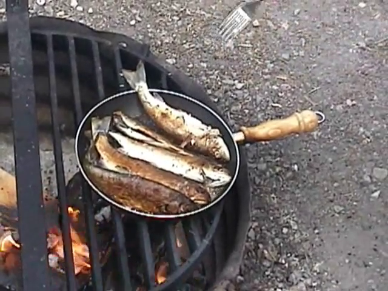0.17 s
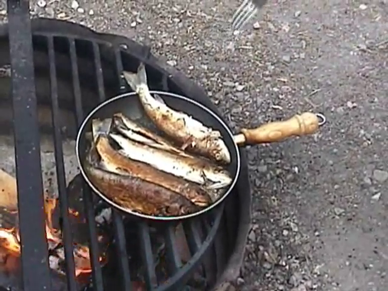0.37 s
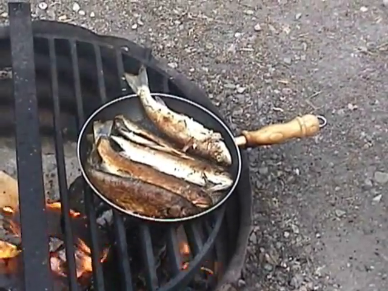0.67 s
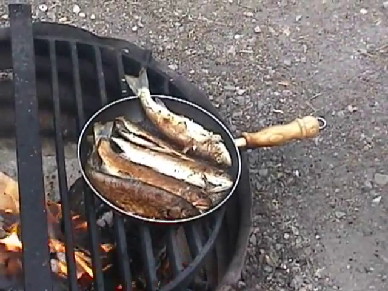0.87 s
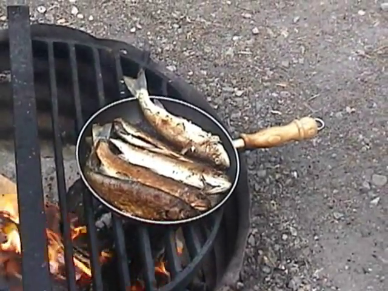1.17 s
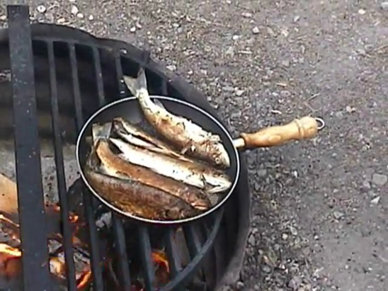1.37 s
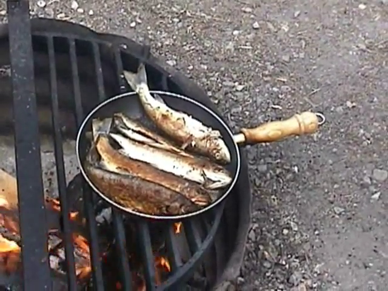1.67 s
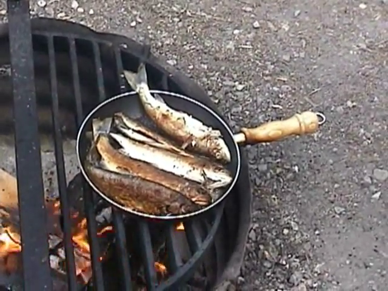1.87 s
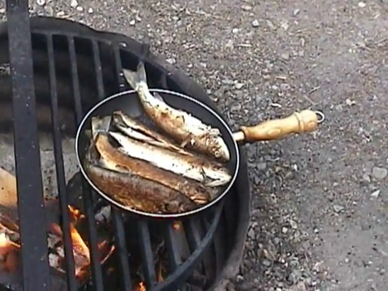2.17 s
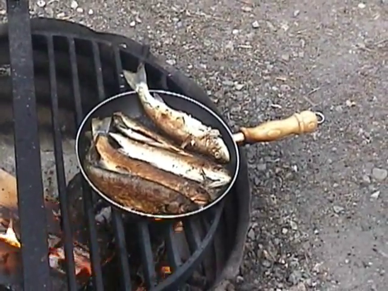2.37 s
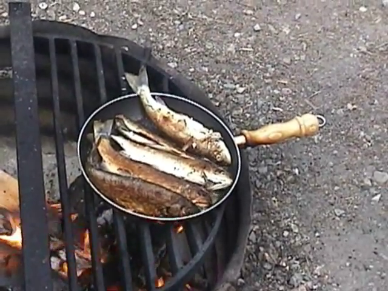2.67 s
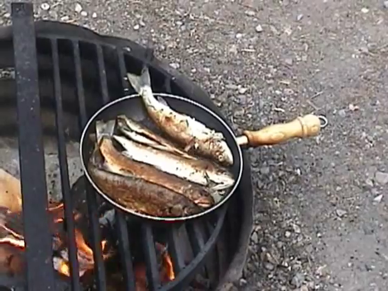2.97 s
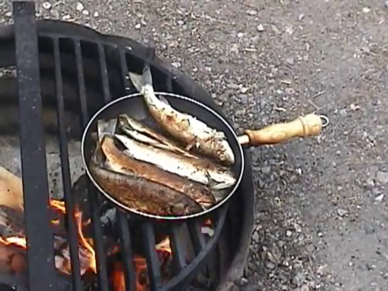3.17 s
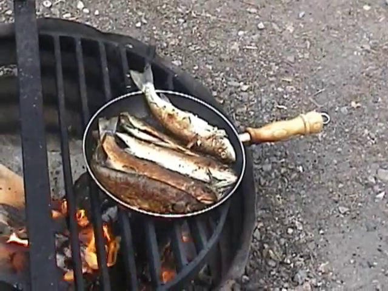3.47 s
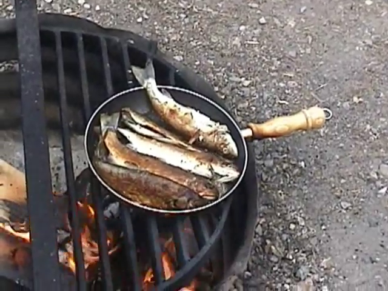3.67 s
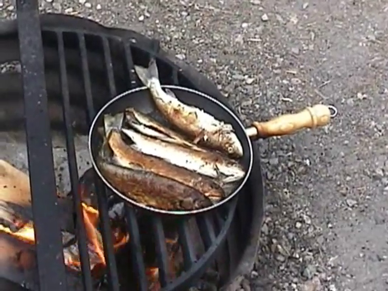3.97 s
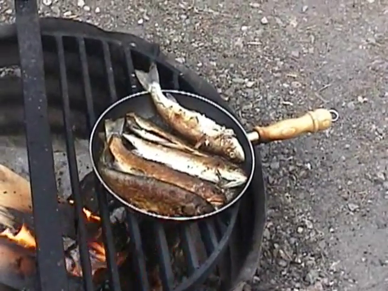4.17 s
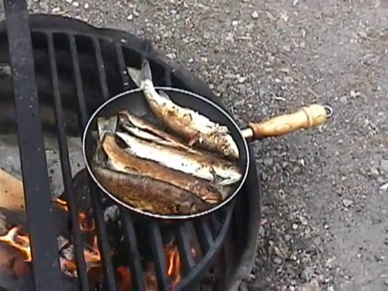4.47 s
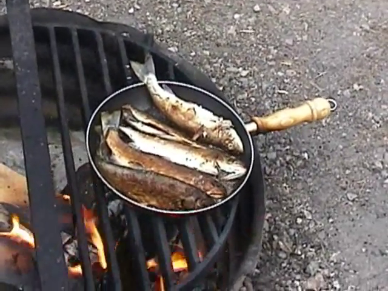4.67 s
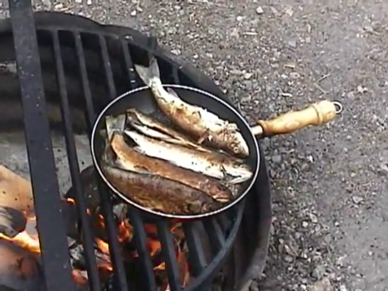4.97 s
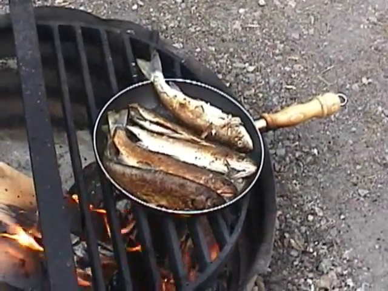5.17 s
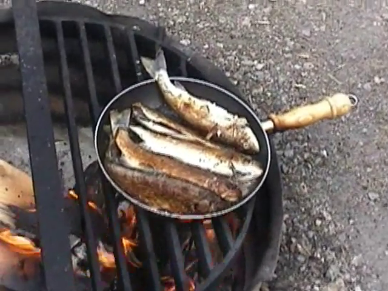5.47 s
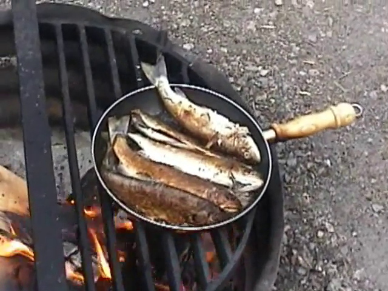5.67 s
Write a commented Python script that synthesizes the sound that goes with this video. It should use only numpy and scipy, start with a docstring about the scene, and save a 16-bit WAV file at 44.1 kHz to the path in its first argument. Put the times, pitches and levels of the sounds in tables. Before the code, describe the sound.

Fish sizzles densely in a frying pan over a campfire, surging early, with one very loud fat pop and many smaller sharp crackles outdoors.

```python
"""A dense sizzle in surges opens the scene: fish fries in a pan on a grate over a campfire, outdoors.
Tiny steam bubbles in the fat are modelled as swarms of decaying noise bursts and short ringing tones.
Under them the flames flutter as shaped noise; drops of water pop as sharp noise blasts with close echoes.
Dull knocks of the burning wood are damped tones in rustle. A hand-held camera hears all this through
two ports; its microphone overloads in the pops and its limiter ducks the level after the loudest one."""
import sys
import numpy as np
from scipy import signal
from scipy.fft import rfft, irfft, next_fast_len
from scipy.io import wavfile
from scipy.ndimage import uniform_filter1d, map_coordinates

SR = 44100
rng = np.random.default_rng(int(sys.argv[2]) if len(sys.argv) > 2 else 0)


def bounce(signal):
    """Save signal as a 16-bit WAV file at the path given by the first command-line argument."""
    frames = np.transpose(np.atleast_2d(signal))
    limited = np.clip(frames, -1, 1)
    pcm = np.round(limited * 32767).astype(np.int16)
    wavfile.write(sys.argv[1], SR, pcm)


N = 257103

# How hard the fat boils. Each row: time in seconds, level in dB before the sputter and hiss offsets.
BOIL_LEVEL = [(-0.0, -34), (0.3, -41.5), (0.68, -42), (0.91, -37), (1.37, -42.47), (1.72, -42.5),
              (1.87, -37.5), (2.36, -33.35), (2.43, -37), (2.82, -42.5), (2.86, -39.64), (3.36, -36.5),
              (3.54, -44.01), (3.81, -42.5), (3.88, -37.5), (4.91, -36.5), (5.16, -39), (5.55, -34.5)]
# Juice runs into the fat and the sizzle flares up.
# Each row: time of the height in seconds, length of the rise and again of the fall in seconds, rise in dB.
JUICE_FLARES = [(.115, .12, 5.5), (.27, 0.14, 9.5), (.41, 0.19, 13.7), (.96, .13, 1), (1.15, .08, 5),
                (1.28, 0.063, 3.5), (1.56, 0.22, 2), (2.09, .05, 5), (2.37, .06, 3), (2.65, 0.17, 7.2),
                (2.91, 0.17, 7), (3.34, 0.17, 4.6), (4.02, 0.22, 5.3), (4.37, .09, 3.5), (4.73, .08, 3),
                (4.89, 0.1, 3)]
# Spectral colour of the frying. Each row: frequency in Hz, gain in dB.
FAT_COLOUR = [(30, -52), (110, -26.5), (400, -15.5), (900, -13.5), (1300, -7), (1900, -6.5), (2500, 0),
              (3100, -1.4), (3700, 1), (4600, -3.5), (7000, .5), (8700, -6.5), (10000, -2), (12500, -5),
              (15500, -10.5)]
# Strength of the flames. Each row: time in seconds, level in dB about which they flutter.
FIRE_LEVEL = [(0, -58.5), (.7, -56.5), (1.5, -55.5), (2.05, -53.5), (2.55, -57), (3.25, -55.5),
              (3.7, -55.5), (4.15, -54.5), (4.75, -55.5), (5.05, -58), (5.5, -55), (5.83, -57)]
# Spectral colour of the flames. Each row: frequency in Hz, gain in dB.
FLAME_COLOUR = [(20, -50), (50, -18), (100, -10), (150, -2.5), (210, -1), (300, -8.5), (450, -8),
                (800, -7.5), (1600, -4.5), (4000, -64)]
# Drops bursting in the fat.
# Each row: start in seconds, level of the crack in dB, of the body in dB, of the thud in dB.
DROP_BURSTS = [(0.3125, -0.5, -10, -25.5), (.3958, -29, -63, -67), (.4045, -24.5, -67, -66),
               (0.4291, -25, -58, -67), (.749, -30, -39.5, -63), (1.299, -20.5, -49, -66),
               (1.381, -25.5, -46, -58), (2.6329, -16, -26, -43), (2.9199, -21, -32, -45),
               (2.943, -13.5, -32, -42), (3.1488, -26, -36, -60), (3.5802, -25, -39.5, -54),
               (3.6046, -29.5, -38.5, -56), (3.634, -25, -35, -48), (3.793, -15, -24, -47),
               (3.8273, -17.5, -47, -45), (3.8411, -17, -33, -51), (3.9957, -22.5, -55, -68),
               (4.0291, -21.5, -45, -56), (4.0654, -21, -49, -60), (4.1983, -21, -44, -56),
               (4.4372, -21.5, -24, -33), (4.7399, -21.5, -30.5, -50), (4.9722, -23, -45, -65),
               (5.4792, -17.5, -33.5, -40.5), (5.6628, -21.5, -38, -54), (5.7198, -22.5, -57, -67),
               (5.772, -23.5, -45, -62)]
# Echoes of a pop off the pan and the fire ring. Each row: delay in seconds, level in dB.
POP_ECHOES = [(.0014, -10), (.003, -9)]
# Dull knocks in the fire. Each row: start in seconds, level in dB before the tone's gain, pitch in Hz.
WOOD_KNOCKS = [(1.732, -35, 453), (1.755, -31, 505), (5.536, -23.5, 660), (5.552, -27, 710),
               (5.560, -27, 990), (5.579, -28, 1260), (5.600, -35, 710), (5.642, -37, 600)]
# Stereo width at the two ports. Each row: frequency in Hz, gain of the side signal in dB.
SIDE_GAIN = [(100, -7), (350, -5), (1000, -8.5), (2500, -14.5), (3300, -10.5), (6000, -14), (8000, -5.5),
             (8900, -6), (9700, -7), (12200, -11), (15000, -6)]
# Level difference of the ports. Each row: frequency in Hz, left minus right in dB.
LEFT_OVER_RIGHT = [(60, 0), (250, -5.5), (700, -3.5), (1400, -0.5), (3700, -1.5), (5000, 0), (7500, -2.5),
                   (9200, 3.5), (11500, 0.5), (15000, 1)]
# Phase difference of the ports. Each row: frequency in Hz, phase by which left leads in radians.
LEFT_PHASE_LEAD = [(100, 0), (700, -0.23), (2500, 0.053), (6000, -0.29), (8000, -0.076), (8600, -1.25),
                   (9300, -0.28), (11000, 0.044), (13500, -.18)]

TOP_HZ = 15800  # highest bubble pitch and upper limit of the whole sound
TICK_HZ = 3470  # lower corner of the small ticks
SPUTTER_DB, HISS_DB = 0.16, 3.5  # low and high part of the sizzle, over the boil level
SPUTTER_SHARE = 0.45  # part of a flare's rise that the sputter follows
HISS_GROWS = 1.14  # dB of hiss per dB of boil, about the mean boil


def amp(db):
    """Logarithmic level: decibels become a linear amplitude gain."""
    return 10 ** (np.asarray(db) / 20)


def unit(x):
    """Normalization of power: x scaled to an rms of 1."""
    return x / np.sqrt(np.mean(x ** 2) + 1e-20)


def along(points, hz):
    """Interpolation on a logarithmic frequency axis."""
    f, v = np.transpose(points)
    return np.interp(np.log(hz + 1), np.log(f + 1), v)


def curves(rows):
    """Linear interpolation in time: one curve for each column after the time."""
    s, *cols = np.transpose(rows)
    return [np.interp(np.arange(N) / SR, s, c) for c in cols]


def wobble(rate):
    """Slow random modulation: a smooth curve through rate random knots a second."""
    knots = rng.standard_normal(int(N * rate / SR) + 4)
    return map_coordinates(knots, [np.arange(N) * rate / SR])


def filtered(x, response):
    """Linear filtering: the spectrum of x is multiplied by a response of frequency."""
    m = next_fast_len(N + SR // 2)
    return irfft(rfft(x, m) * response(np.fft.rfftfreq(m, 1 / SR)), m)[..., :N]


def band(x, low_hz, high_hz, order=2):
    """Causal band-pass: a Butterworth filter keeps the range between two corners."""
    corners = [low_hz, min(high_hz, SR / 2 - 1)]
    return signal.sosfilt(signal.butter(order, corners, "band", fs=SR, output="sos"), x)


def coloured(x, gain):
    """Minimum phase: the causal filter with this gain over frequency keeps attacks sharp."""
    size = 2048
    cepstrum = irfft(np.log(np.maximum(gain(np.fft.rfftfreq(size, 1 / SR)), 1e-6)))
    # folding the cepstrum onto positive times gives the minimum phase
    cepstrum[1:size // 2] *= 2
    cepstrum[size // 2 + 1:] = 0
    impulse = irfft(np.exp(rfft(cepstrum)))
    return signal.fftconvolve(x, impulse[None], axes=1)[:, :N]


def add(track, s, sound):
    """Superposition: a sound is mixed into the track from time s in seconds."""
    room = track[..., round(s * SR):][..., :sound.shape[-1]]
    room += sound[..., :room.shape[-1]]


def bursts(rate, spread_db, range_db, life, tail, tail_db):
    """Shot noise: many weak and few strong bursts, rate a second, each with a faint scattered tail."""
    count = int(rate * N / SR)
    draw = rng.random((count, 2))
    # truncated exponential spread of levels
    size_db = -spread_db * np.log(1 - draw[:, 1] * (1 - np.exp(-range_db / spread_db)))
    energy = np.bincount((draw[:, 0] * N).astype(int), amp(size_db) ** 2, N)
    t = np.arange(SR // 50) / SR
    # energy decays twice as fast as amplitude; life and tail are amplitude decay times in seconds
    fade = np.exp(-2 * t / life) + amp(tail_db) ** 2 * np.exp(-2 * t / tail)
    envelope = np.sqrt(np.abs(signal.fftconvolve(energy, fade)[:N]))
    return unit(envelope * rng.standard_normal((2, N)))  # mid and side


def bubbles(rate, spread_db, life):
    """Damped resonance: each small bubble rings briefly at its own pitch, decaying over life seconds."""
    draw = rng.random((int(rate * N / SR), 4))
    start, pitch, size, place = draw.T[:, :, None]
    k = np.arange(SR // 200)
    tone = np.sin(2 * np.pi * pitch * TOP_HZ * k / SR)
    ring = amp(spread_db * size ** 2) * tone * np.exp(-k / SR / life)
    at = ((start * N).astype(int) + k).ravel()
    # mid takes every ring equally, side by its place
    return np.array([unit(np.bincount(at, (ring * g).ravel(), N)[:N]) for g in (1, place - .5)])


def sizzle():
    """Boiling: fizz, ringing bubbles, snaps and ticks; sputter and hiss surge as water meets the fat."""
    boil_db, = curves(BOIL_LEVEL)
    mean_db = boil_db.mean()
    t = np.arange(N) / SR
    flare_db = sum(rise_db * np.cos(np.pi / 2 * np.clip((t - s) / length, -1, 1)) ** 4
                   for s, length, rise_db in JUICE_FLARES)
    sputter_db = boil_db + SPUTTER_DB + SPUTTER_SHARE * flare_db
    hiss_db = mean_db + HISS_DB + HISS_GROWS * (boil_db - mean_db) + flare_db
    fizz = bursts(rate=7500, spread_db=6, range_db=10, life=0.00037, tail=0.0066, tail_db=-8)
    ticks = bursts(rate=210, spread_db=2.5, range_db=20, life=0.00024, tail=0.0061, tail_db=-13.0)
    ticks = unit(band(ticks, TICK_HZ, TOP_HZ, order=1))
    ringing = bubbles(rate=1200, spread_db=17, life=.0011)
    snaps = bubbles(rate=330, spread_db=25.5, life=0.0001)
    boil = fizz + amp(-2.5) * ticks + amp(-4.5) * ringing + amp(-9.0) * snaps
    boil = coloured(boil, lambda hz: amp(along(FAT_COLOUR, hz)))
    # large bubbles sputter low, small ones hiss high
    sputter = filtered(boil, lambda hz: 1 / (1 + (hz / 5200) ** 6))
    hiss = boil - sputter
    sputter_gain = amp(sputter_db + 0.96 * wobble(25))
    hiss_gain = amp(hiss_db + 1.4 * wobble(25))
    return sputter_gain * unit(sputter) + hiss_gain * unit(hiss)


def flames():
    """Combustion noise: spectrally shaped noise, randomly modulated, makes a soft, low flutter."""
    fire_db, = curves(FIRE_LEVEL)
    noise = rng.standard_normal((2, N))
    roar = unit(filtered(noise, lambda hz: amp(along(FLAME_COLOUR, hz))))
    return roar * amp(fire_db + 1.43 * wobble(18))


def pops(life=0.00025, growth=0.033, tail=0.0071, tail_db=-18,
         offset_db=-25, offset_grows=1.43, deepens=.5, offset_life=0.018):
    """Steam explosion: a drop cracks in about a millisecond or less, with close echoes and a faint tail.

    Overload of the microphone adds a one-sided low-frequency offset, dying away in about 20 ms."""
    out, t = np.zeros((2, N)), np.arange(SR // 4) / SR
    span = .006 * SR  # each part has the energy of its level held for 6 ms
    for s, crack_db, body_db, thud_db in DROP_BURSTS:
        length = life * np.exp(growth * (crack_db + 34))  # bigger drops take longer to burst
        blast = np.exp(-t / length) + amp(tail_db) * np.exp(-t / tail)
        for delay, db in POP_ECHOES:
            blast = blast + amp(db) * (t > delay) * np.exp(-np.abs(t - delay) / length)
        crack, body, thud = blast * rng.standard_normal((3, 2, len(t)))
        crack = band(band(crack, 2450, 13400), 1200, 21700, order=1)
        low_hz = min(1150, 950 * amp(-deepens * (body_db + 23)))  # a fuller body reaches lower
        body = band(band(body, low_hz, 2700, order=1), 290, 7100)
        thud = band(band(thud, 100, 273, order=1), 65, 1700)
        parts = [(crack_db, crack), (body_db, body), (thud_db, thud)]
        pop = sum(amp(db) * x * np.sqrt(span) / np.linalg.norm(x, axis=1, keepdims=True)
                  for db, x in parts)
        # the microphone's overload offset grows faster than the crack, so weak bursts have almost none
        offset_gain = amp(offset_db + offset_grows * crack_db)
        offset = offset_gain * (np.exp(-t / offset_life) - np.exp(-t / length))
        add(out, s, pop * amp([[0], [-1.5]]) + offset * [[1], [0]])  # the offset is in mid only
    return out


def knocks(t60=0.056, wood_db=-7):
    """Damped vibration: burning wood shifts, a tone in a dull rustle falling 60 dB in t60 seconds."""
    out, t = np.zeros((2, N)), np.arange(SR // 8) / SR
    for s, db, hz in WOOD_KNOCKS:
        tone = np.sin(2 * np.pi * hz * t) * amp([[-6], [-14]])  # mid and side
        rustle = unit(band(rng.standard_normal((2, len(t))), hz * 0.4, hz * 2.4))
        add(out, s, amp(db - 60 * t / t60) * (tone + amp(wood_db) * rustle))
    return out


def limited(x, threshold_db, release_db_per_s):
    """Limiting: gain drops by the excess over the threshold and recovers at a steady rate."""
    power = np.abs(uniform_filter1d(np.mean(x ** 2, axis=0), size=256))
    excess_db = np.maximum(10 * np.log10(power + 1e-12) - threshold_db, 0)
    recovery_db = release_db_per_s * np.arange(N) / SR
    return x * amp(recovery_db - np.maximum.accumulate(excess_db + recovery_db))


def scene():
    """Superposition: all sources, as mid and side, reach two closely spaced ports."""
    mid, side = sizzle() + flames() + pops() + knocks()
    side = filtered(side, lambda hz: amp(along(SIDE_GAIN, hz)))
    ports = np.array([mid + side, mid - side])

    def port_response(hz):
        """Symmetric division: each port takes half the level and phase difference, with opposite sign."""
        ratio = amp(along(LEFT_OVER_RIGHT, hz)) * np.exp(1j * along(LEFT_PHASE_LEAD, hz))
        return ratio ** np.array([[.5], [-.5]])

    return filtered(ports, port_response)


def record(dry, notch_hz=5250, notch_width_hz=1200, ceiling=0.8):
    """Camera response: a treble notch, a limiter that ducks loud pops, soft saturation and a band limit."""
    def notch(hz):
        """Resonant cancellation: the response vanishes at the notch frequency."""
        detuning = notch_hz ** 2 - hz ** 2
        return detuning / (detuning + 1j * hz * notch_width_hz)

    x = filtered(dry, notch)
    x = limited(x, threshold_db=-10, release_db_per_s=126)
    x = x / (1 + np.abs(x / ceiling) ** 4) ** (1 / 4)  # rounds off the highest peaks
    return filtered(x, lambda hz: hz < TOP_HZ)


dry = scene()
out = record(dry)
bounce(out)
```